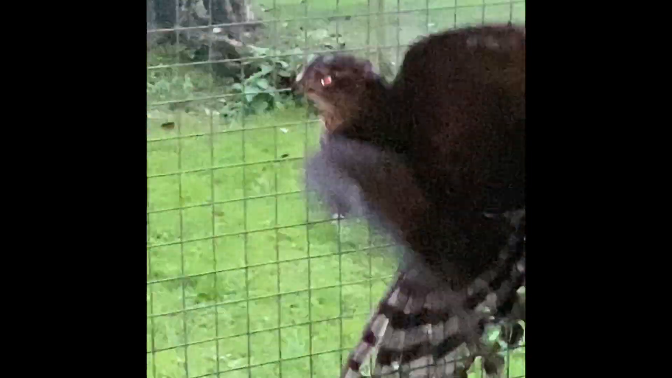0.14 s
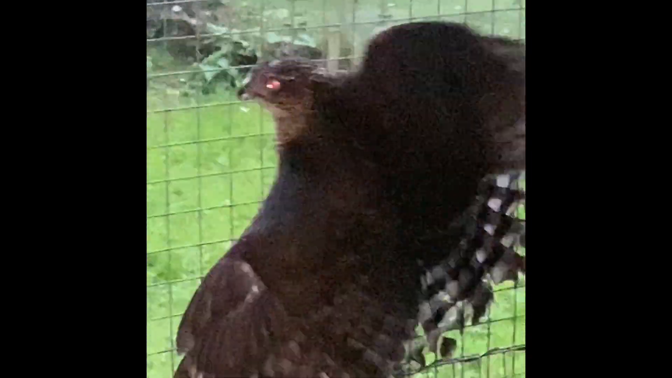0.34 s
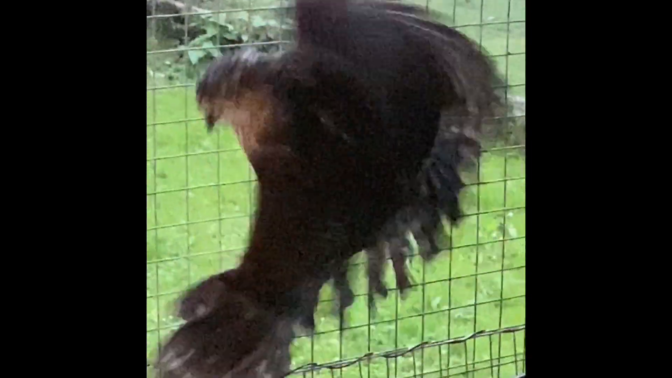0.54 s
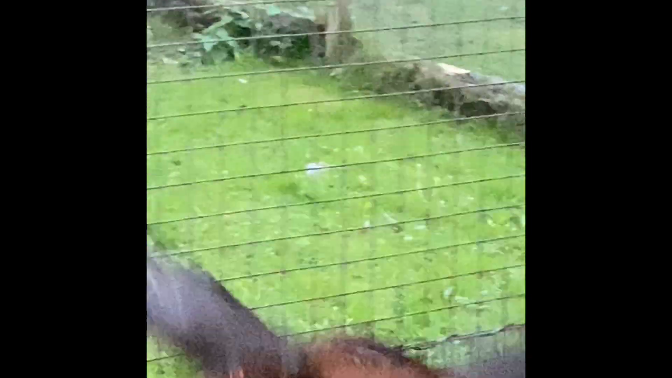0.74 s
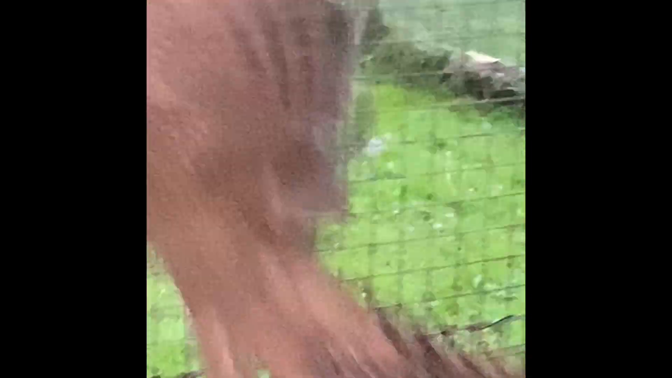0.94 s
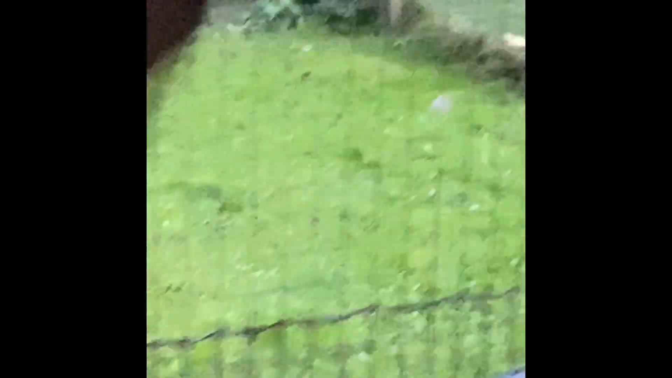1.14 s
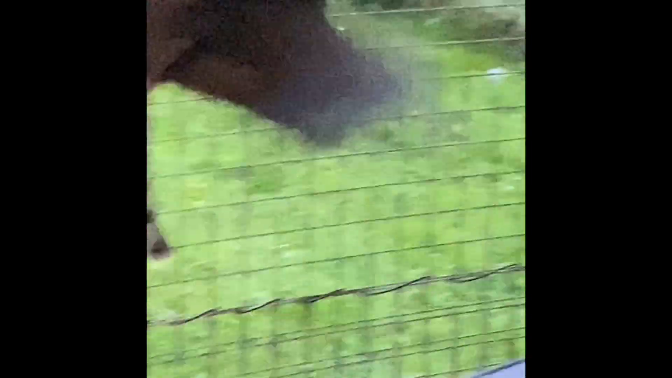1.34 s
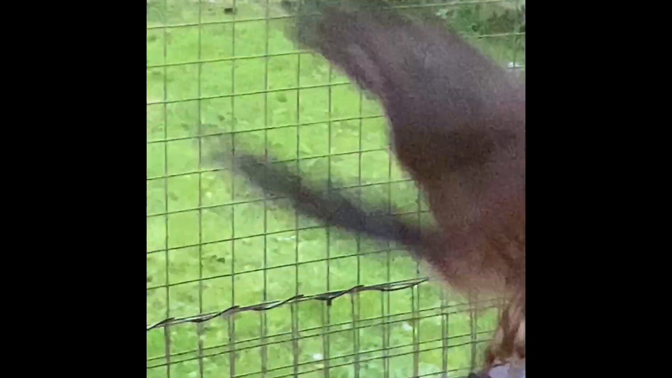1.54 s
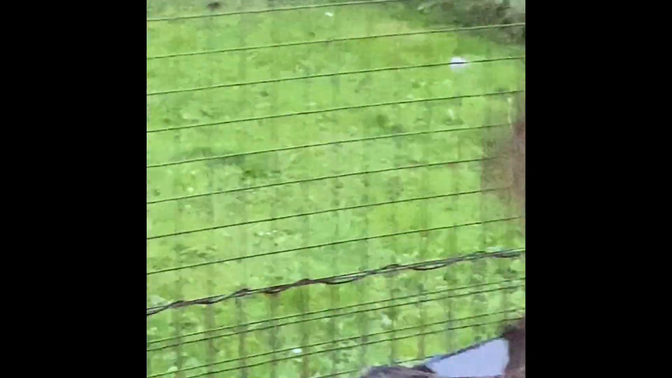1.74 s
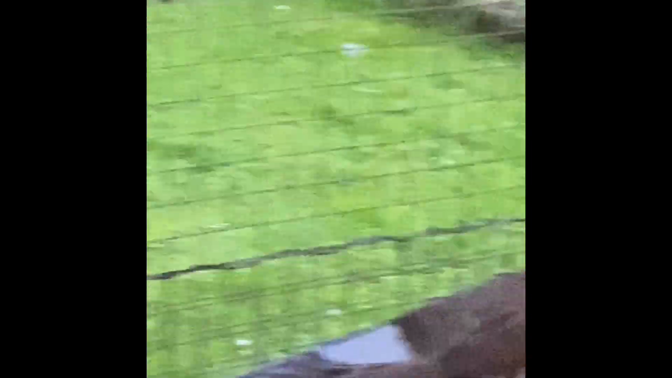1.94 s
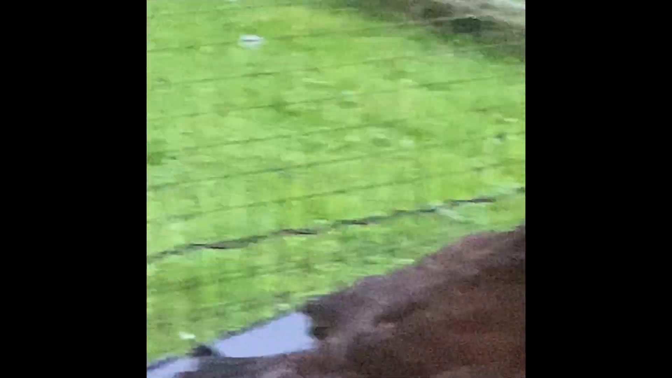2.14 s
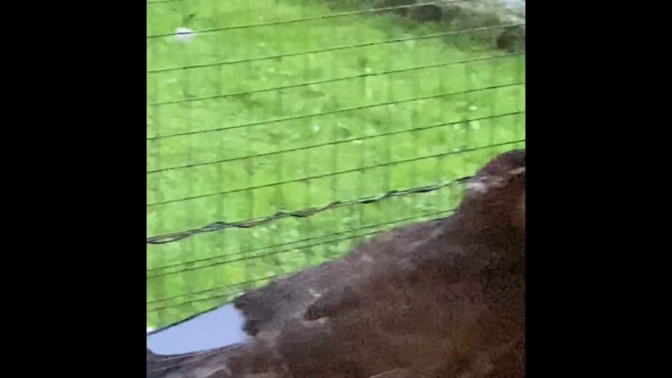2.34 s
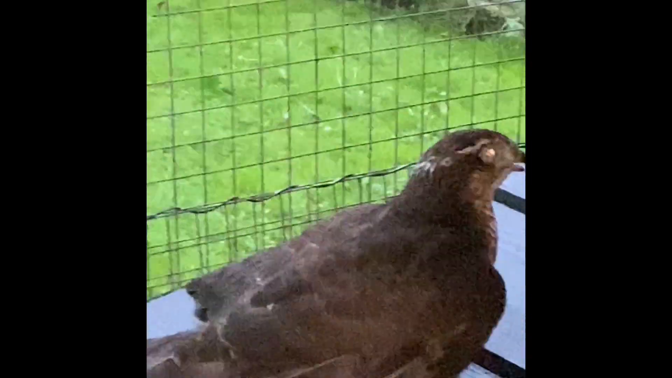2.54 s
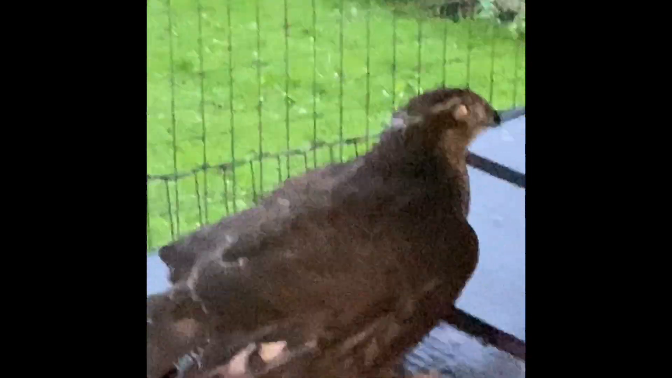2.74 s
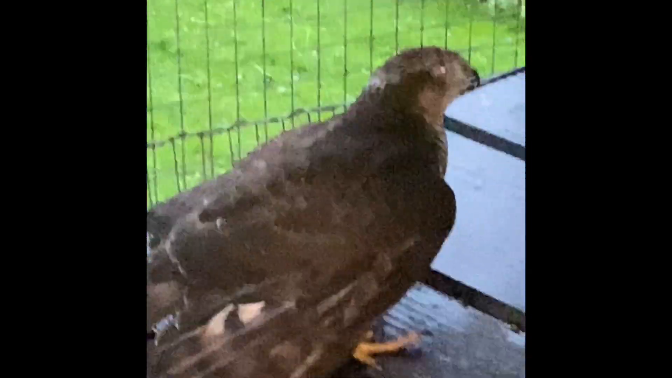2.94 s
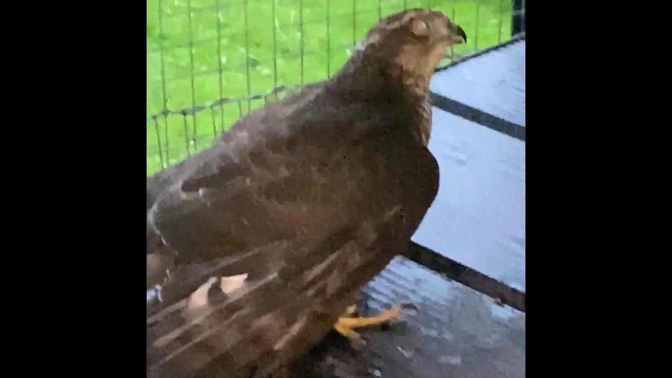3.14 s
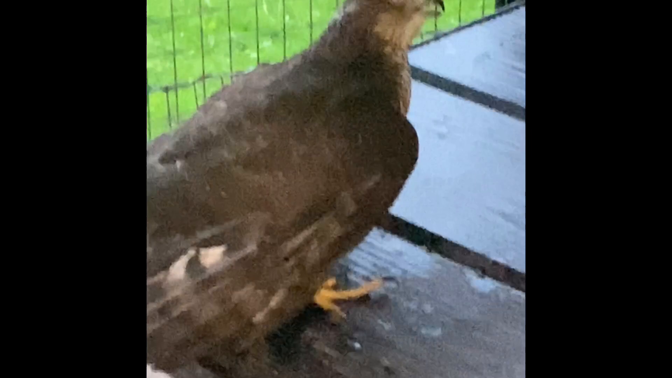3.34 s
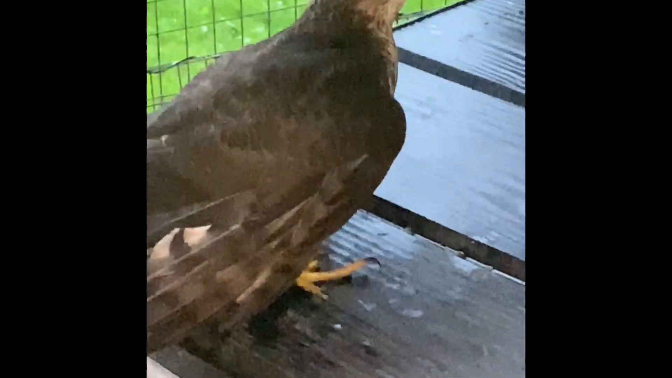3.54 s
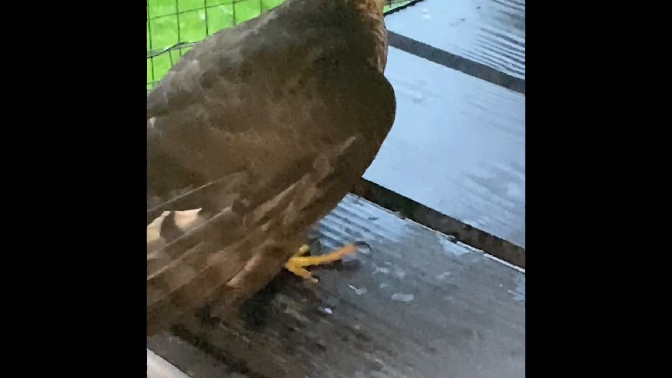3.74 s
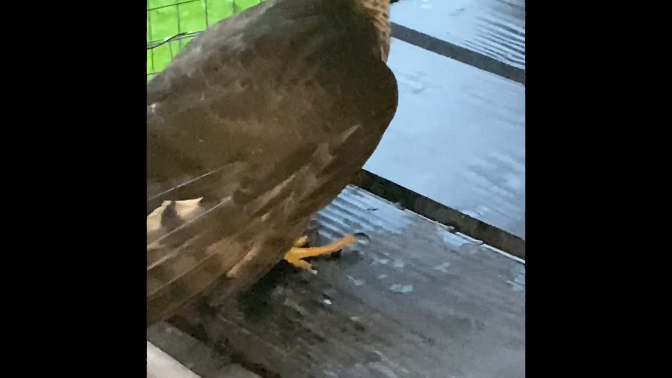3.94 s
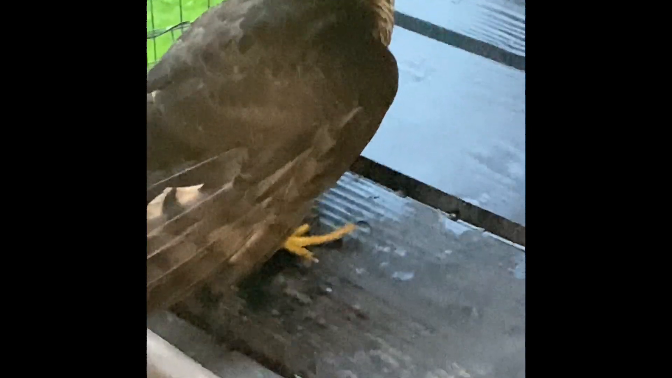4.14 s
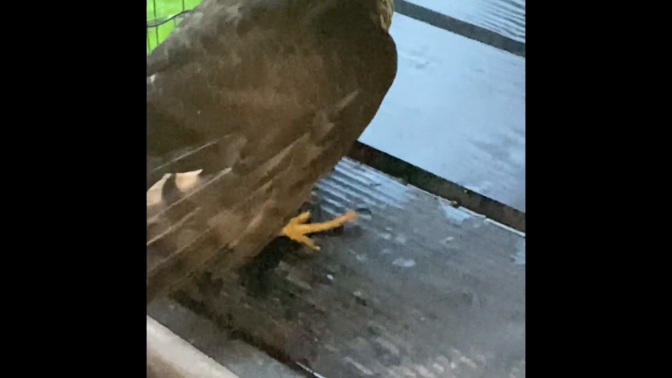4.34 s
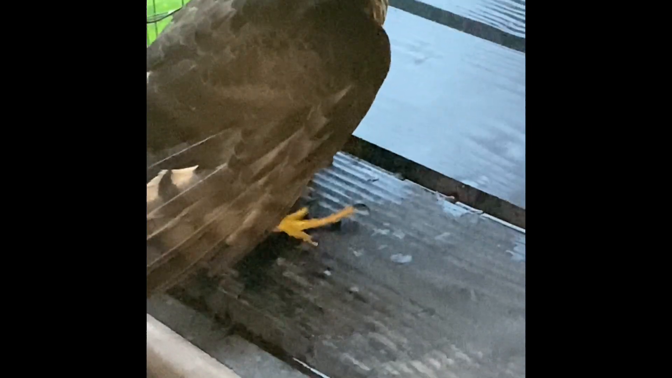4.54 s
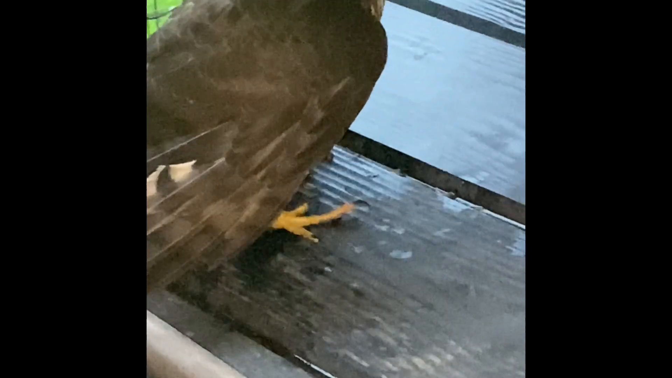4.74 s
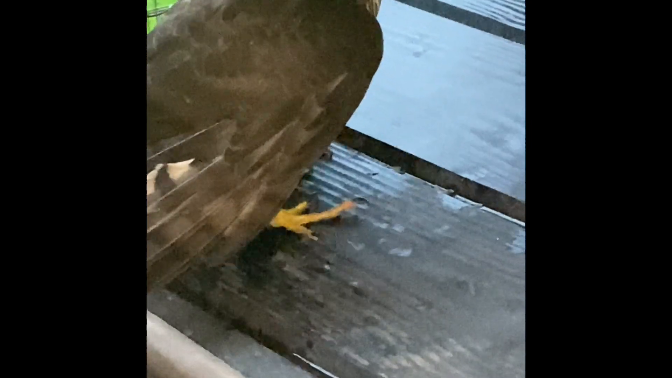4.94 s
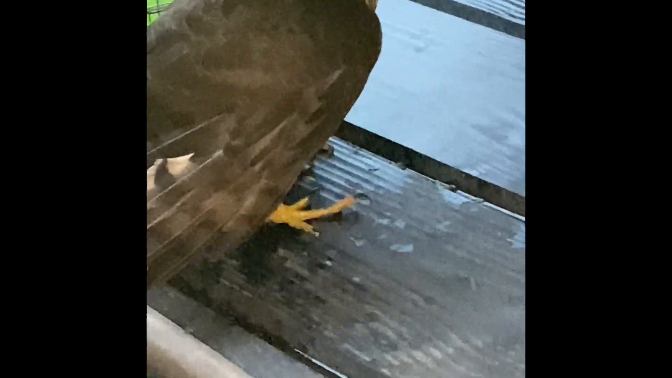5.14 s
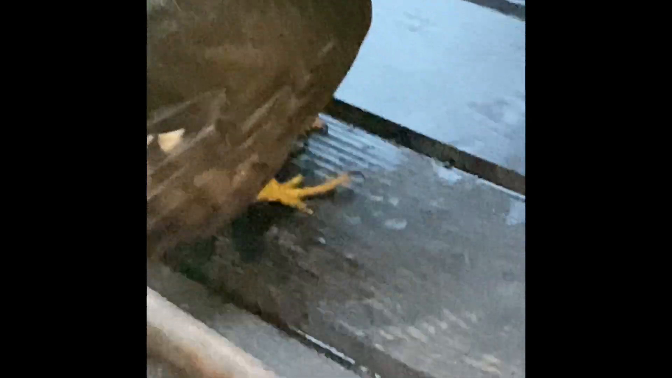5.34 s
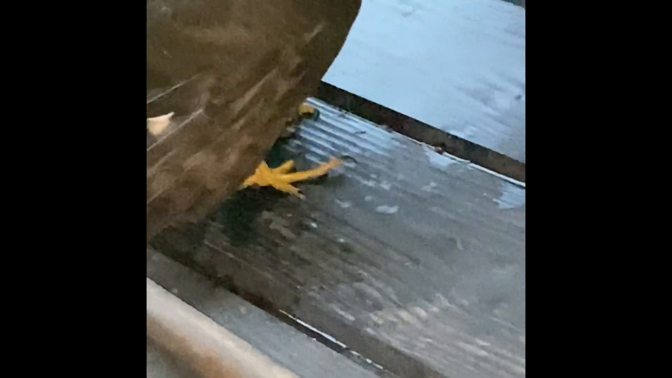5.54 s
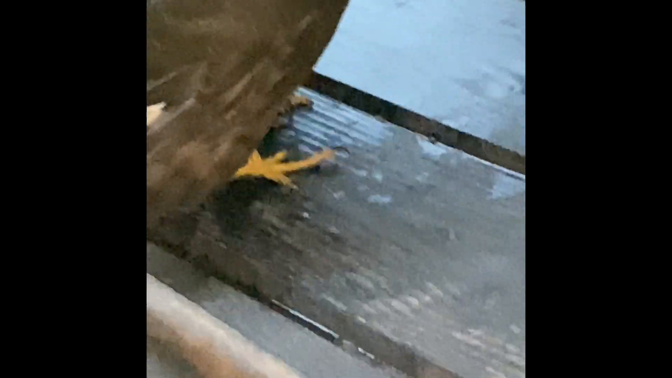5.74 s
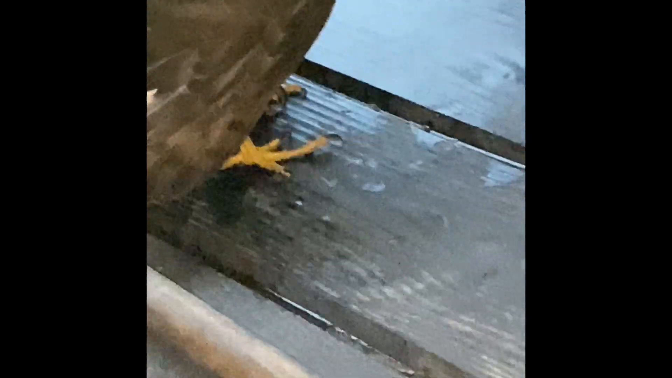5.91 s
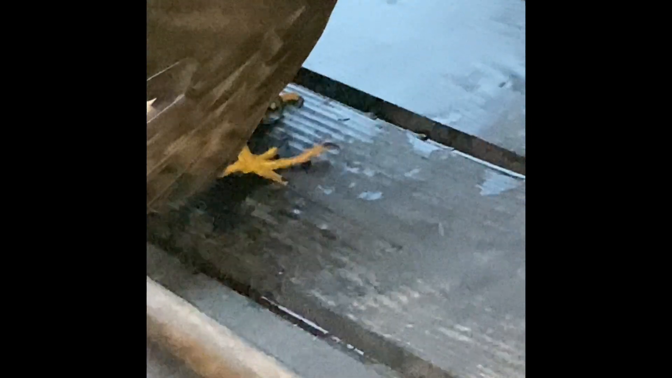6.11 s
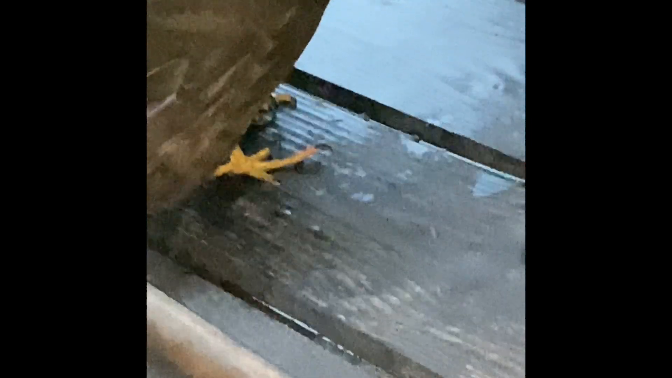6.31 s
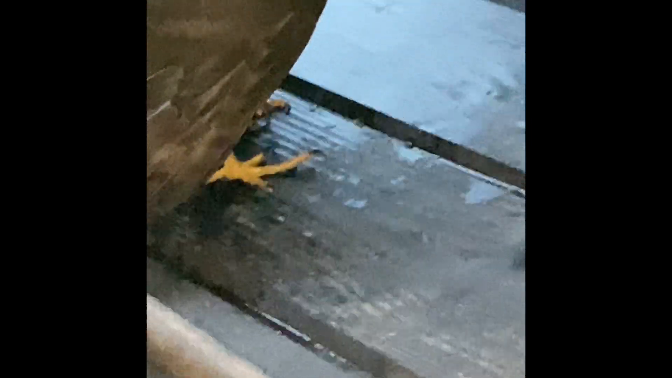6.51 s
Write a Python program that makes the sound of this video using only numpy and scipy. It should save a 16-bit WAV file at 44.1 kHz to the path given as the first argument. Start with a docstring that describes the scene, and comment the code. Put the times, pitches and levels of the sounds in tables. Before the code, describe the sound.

A quiet garden, heard by a stereo microphone close to a wire pen. At 0 s air and feathers stir, with a soft thump and dull cluck at 0.08, then hollow knock-like clucks at 0.34, 0.58 (strongest) and 0.92. Around 0.5-0.75 wings swish and zip over the mesh, with wire snaps, a twang and thuds. From 0.94 to 1.8 the thrashing is loudest: grainy hissing sweeps, flapping slaps, hard ticks, low air puffs, then heavy thumps at 1.4 and 1.55-1.65 with bright twangs. It fades to small rustles by 2.2. From 2.85 to 4.3 a distant small songbird sings thin high whistles, then quick gliding and buzzing notes, echoing in trees; one cluck falls at 3.17. Rougher, more open clucks follow at 4.42, 4.91, 5.11, faintly 5.67, and 6.35, with low hoarse murmurs between 4.5 and 5.6. Faint crisp plumage rustles and soft hush last until about 6.7.

```python
"""A hawk thrashes against the wire mesh of a garden pen, then settles on the wet boards.
Its feathers hiss and zip as noise, wires tick, snap and twang, the frame rings in decaying tones, and air puffs.
Short knock-like clucks and hoarse murmurs, probably a hen's, are uneven pulses sent through resonances.
A small songbird in the trees sings one phrase of gliding and buzzing tones; the garden is a faint hush of noise."""
import sys
import numpy as np
from scipy import signal
from scipy.fft import rfft, irfft, next_fast_len
from scipy.io import wavfile
from scipy.ndimage import uniform_filter1d

SR = 44100
rng = np.random.default_rng(int(sys.argv[2]) if len(sys.argv) > 2 else 0)


def digitize_waveform(pressure):
    """Quantize a signal to 16-bit integers and store it at the path in sys.argv[1].

    Rows of a 2-D input are taken as channels; values are limited to [-1, 1].
    """
    field = np.atleast_2d(pressure).T
    bounded = np.clip(field, -1, 1)
    quanta = np.round(bounded * 32767).astype(np.int16)
    wavfile.write(sys.argv[1], SR, quanta)


N = 294132
TIME = np.arange(N) / SR


def from_db(db):
    """Turn decibels into a gain."""
    return 10 ** (np.asarray(db) / 20)


def rms_one(x):
    """Scale a sound to an rms of 1."""
    return x / np.sqrt(np.mean(x ** 2) + 1e-20)


def level(rows):
    """Gain at every sample from rows (time [s], level [dB])."""
    return from_db(np.interp(TIME, *np.transpose(rows)))


def at_hz(points, hz):
    """Read a table of rows (frequency, value) on a log-frequency axis."""
    table_hz, values = np.array(points)[:, 0], np.array(points)[:, 1]
    return np.interp(np.log(hz), np.log(table_hz), values)


def add(track, s, sound):
    """Mix a short sound into the track at time s."""
    start = max(round(s * SR), 0)
    track[start:start + len(sound)] += sound[:max(N - start, 0)]


def drift(rate):
    """Random wander around 0: a new random value `rate` times a second, joined by straight lines."""
    knots = rng.standard_normal(8192)
    return np.interp(TIME * rate, np.arange(len(knots)), knots)


def lowpass(x, order, cutoff_hz):
    """Dull a sound above the cutoff."""
    return signal.sosfilt(signal.butter(order, cutoff_hz, fs=SR, output="sos"), x)


def resonate(x, hz, width):
    """Two-pole resonance with gain 1 on top."""
    r = np.exp(-np.pi * width / SR)
    top = np.array([1, 0, -1]) * (1 - r * r) / 2
    return signal.lfilter(top, [1, -2 * r * np.cos(2 * np.pi * hz / SR), r * r], x)


def ring(clicks, hz, t60):
    """A unit click sets a sine of height 1 ringing; it falls by 60 dB in t60 seconds."""
    r, w = np.exp(-np.log(1000) / (t60 * SR)), 2 * np.pi * hz / SR
    return signal.lfilter([0, np.sin(w)], [1, -2 * r * np.cos(w), r * r], clicks + 1e-18)


def coloured(spectrum, likeness, grain_db=0):
    """Stereo noise of rms 1 in half-octave bands; grain_db clumps it into tiny clicks."""
    edges = 22 * 2 ** np.arange(0, 10, .5)
    clumps = np.repeat(rng.standard_normal(N // 16 + 1).clip(-3, 3), 16)[:N]
    white = rng.standard_normal((2, 2, N)) * from_db(grain_db * clumps)
    out = 0
    for k, (low, high) in enumerate(zip(edges, edges[1:])):
        band = signal.butter(2, [low, high], "band", fs=SR, output="sos")
        mid, side = signal.sosfilt(band, white[k % 2])   # neighbouring bands use separate noise
        hz = np.sqrt(low * high)
        alike = np.clip(at_hz(likeness, hz), -1, 1)
        stereo = np.sqrt(1 + alike) * mid + np.sqrt(1 - alike) * side * [[1], [-1]]
        out = out + from_db(at_hz(spectrum, hz)) * stereo
    return rms_one(out)


def scatter(x, t60, wet_db, apart):
    """Add dense fading echoes as noise tails, partly different at each port."""
    t = TIME[:SR]
    shared, own = rng.standard_normal((2, SR))
    fade = np.exp(-np.log(1000) * t / t60) * (t > .005)
    tail = (shared + apart * own * [[1], [-1]]) * fade
    tail = tail / np.sqrt(np.sum(tail ** 2) / 2)
    return x + from_db(wet_db) * signal.fftconvolve(np.atleast_2d(x), tail, axes=1)[:, :N]


# tone colour of the distant hush: (frequency [Hz], relative level per Hz [dB])
GARDEN_COLOUR = [(24, -1), (45, -5), (90, -4.5), (200, -6.5), (560, -7), (900, -10), (1400, -9),
                 (2800, -15), (5500, -24), (8000, -32.5), (12000, -33), (16000, -41)]
# how alike left and right are in the hush: (frequency [Hz], likeness [-1 to 1])
GARDEN_LIKENESS = [(60, 0.94), (130, 0.96), (290, 0.73), (640, 0.022), (1400, 0.26), (3100, 1), (7000, 1),
                   (15000, 1)]
# loudness of the hush: (time [s], level [dB])
HUSH_LEVEL = [(0, -62.5), (2.6, -60.5), (3.6, -62.5), (3.9, -59), (4.5, -60), (5.25, -62), (5.38, -61),
              (6.2, -64.5), (6.67, -62)]


def garden():
    """The distant garden is a steady, slightly grainy noise whose level wanders."""
    hush = coloured(GARDEN_COLOUR, GARDEN_LIKENESS, grain_db=3.0)
    return level(HUSH_LEVEL) * from_db(drift(12)) * hush


TRILL_HZ = 123.3   # how often the pitch swings up and down each second


def song_note(length, start_hz, end_hz, db, trill_hz, waver_hz, arch_hz=0):
    """One note: a sine on an arched glide, with a trill and a random waver on its pitch."""
    u = np.linspace(0, 1, int(length * SR))
    glide = start_hz + (end_hz - start_hz) * u + arch_hz * np.sin(np.pi * u)
    trill = trill_hz * np.sin(2 * np.pi * TRILL_HZ * length * u)
    hz = glide + trill + waver_hz * drift(396.0)[:len(u)]
    swelling = np.sqrt(2) * np.sin(np.pi * u)
    return from_db(db) * swelling * np.sin(2 * np.pi * np.cumsum(hz) / SR)


# whistled glides: (time [s], length [s], start pitch [Hz], end pitch [Hz], level [dB],
# arch of the glide [Hz], trill depth [Hz])
SONG_WHISTLES = [(2.848, 0.11, 9150, 8400, -63, 10, 97), (2.949, 0.069, 8940, 8800, -63.5, 11, 108),
                 (3.188, 0.043, 4640, 4660, -62, 1, -4), (3.211, 0.073, 4130, 3780, -50, -95.5, -4),
                 (3.215, 0.083, 2680, 3080, -60, -70, 4), (3.29, 0.049, 3200, 3540, -52, 63, 0),
                 (3.336, 0.045, 3560, 3510, -53, 0, 0), (3.558, 0.022, 2620, 4500, -57, -150, 0),
                 (3.575, 0.029, 3950, 5300, -49.5, -2, 100), (3.629, 0.025, 5170, 5230, -48, 65, 3),
                 (3.634, 0.034, 4100, 2950, -64, -480, -2), (3.687, .028, 4800, 5300, -51, 3, 198),
                 (3.707, 0.024, 4600, 3520, -52, -280, 2), (3.824, 0.064, 5400, 5850, -68.5, 122, 150),
                 (3.909, 0.077, 3760, 3780, -51, 45, 33), (3.989, 0.04, 3480, 3950, -49.5, 4, 177),
                 (4.031, 0.041, 5250, 5080, -57.5, -3, 60), (4.05, 0.068, 3900, 4520, -47.5, 118, 203),
                 (4.221, 0.045, 3250, 3680, -54.5, -100, 0), (4.25, 0.02, 3330, 3290, -71, -6, 0),
                 (4.282, 0.063, 3400, 3750, -66, 0, 150), (4.347, 0.064, 4270, 4050, -65.5, 0, 0)]
# buzzy notes: (time [s], length [s], centre pitch [Hz], level [dB], rise in pitch [Hz], trill depth [Hz])
SONG_BUZZES = [(3.113, 0.15, 3316, -58.5, -300, 450), (3.118, 0.15, 4930, -57.5, -500, 402),
               (3.459, 0.092, 4680, -52.5, 1303, 590), (3.57, 0.046, 4550, -51.5, 899, 400),
               (3.653, 0.05, 4580, -47.5, 202, 200), (3.697, 0.037, 4560, -49.5, -900, 454),
               (3.811, 0.025, 3050, -60, 300, 403), (3.815, 0.074, 4270, -57, 296, 450),
               (3.899, 0.034, 4800, -57, 498, 200), (4.146, 0.043, 5010, -47.5, 606, 250)]
WHISTLE_WAVER_HZ, BUZZ_WAVER_HZ = 42, 180   # random waver of the pitch
TREES_T60_S, TREES_DB = 0.51, 1   # echoes of the song


def songbird():
    """Whistles and buzzes, both gliding sines, waver in loudness and are blurred by echoes in the trees."""
    out = np.zeros(N)
    for s, length, start_hz, end_hz, db, arch_hz, trill_hz in SONG_WHISTLES:
        add(out, s, song_note(length, start_hz, end_hz, db, trill_hz, WHISTLE_WAVER_HZ, arch_hz))
    for s, length, hz, db, rise_hz, depth_hz in SONG_BUZZES:
        add(out, s, song_note(length, hz - rise_hz / 2, hz + rise_hz / 2, db, depth_hz, BUZZ_WAVER_HZ))
    return scatter(out * from_db(2.5 * drift(220)), TREES_T60_S, TREES_DB, apart=0.25)


def formants(x, modes):
    """Parallel steep resonances from rows (frequency [Hz], width [Hz], level [dB]); rms 1."""
    out = 0
    for hz, width, db in modes:
        band = signal.butter(2, [max(hz - width / 2, 30), hz + width / 2], "band", fs=SR, output="sos")
        out = out + from_db(db) * resonate(signal.sosfilt(band, x), hz, 2 * width)
    return rms_one(out)


# resonances of the mouth: (frequency [Hz], width [Hz], relative level [dB])
MOUTH_RESONANCES = [(347, 192, 6.5), (549, 153, 12.5), (720.4, 160, 8)]
# upper resonances: (multiple of the beak resonance [ratio], width [Hz], relative level [dB])
BEAK_RESONANCES = [(.44, 300, -9.5), (.65, 200, -3.5), (1, 242, 2.5), (1.17, 130, -3)]
# upper resonances grow with opening and with loudness: base, dB per dB of loudness, reference loudness
BEAK_DB, BEAK_PER_LOUD_DB, LOUD_DB = 6.5, 4.5, -28
THROAT_TOP_HZ = 1060   # with the beak shut little gets out above this
CLUCK_CREST_SHARE = 0.32   # a cluck is loudest this far into its length


def hen_note(length, pitch_hz, rough, throat_hz, db, open_db, beak_hz, crest=CLUCK_CREST_SHARE):
    """A few uneven pulses through the throat; an open beak adds further resonances."""
    t = TIME[:SR // 4]
    rough, progress = np.clip(rough, 0, 1), np.clip(t / length, 0, 1)
    jitter = rms_one(uniform_filter1d(rng.standard_normal(len(t)), size=120))
    falling = 0.056 * (1 - 2 * progress)   # the pitch slides down through the note
    cycles = np.cumsum(pitch_hz * (1 + falling + 0.04 * rough * jitter)) / SR
    pulses = rms_one(np.diff(np.floor(cycles + .5), prepend=0))
    effort = np.interp(progress, [0, np.clip(crest, .1, .9), 1], [0, 1, 0]) ** 0.66
    source = effort * ((1 - rough) * pulses + rough * rng.standard_normal(len(t)))
    throat = formants(source, [(throat_hz, 230, 0)])
    throat = throat + from_db(open_db) * formants(source, MOUTH_RESONANCES)
    beak = [(multiple * beak_hz, width, mode_db) for multiple, width, mode_db in BEAK_RESONANCES]
    beak_db = BEAK_DB + open_db + BEAK_PER_LOUD_DB * (db - LOUD_DB)
    voice = lowpass(throat, 4, THROAT_TOP_HZ) + from_db(beak_db) * formants(source, beak)
    return from_db(db) * rms_one(voice) * np.sqrt(length / t[-1])


LINGER_T60_S = 0.29   # a cluck's strongest partial rings on


def lingering(length, hz, db):
    """One partial builds up while the cluck lasts, then dies away."""
    t = TIME[:SR // 2]
    fade = from_db(db - 60 * np.maximum(t - length, 0) / LINGER_T60_S)
    build_up = np.minimum(t / length, 1) ** 2
    return fade * build_up * np.sqrt(2) * np.sin(2 * np.pi * hz * t)


# clucks: (time [s], length [s], pitch [Hz], roughness [0-1], throat resonance [Hz], level [dB],
# opening of the beak [dB], beak resonance [Hz], lingering note [Hz], level of the lingering note [dB])
HEN_CLUCKS = [(0.075, 0.0094, 262, 0.24, 520, -39.5, -26, 2200, 498, -56),
              (0.337, 0.013, 234, 0.08, 413, -36.5, -41, 2200, 459, -52),
              (0.581, 0.025, 258, 0.17, 459, -29, -26.5, 2190, 520, -46),
              (0.921, 0.024, 295, 0.55, 490, -35.5, -30, 2200, 502, -48),
              (3.171, 0.014, 244, 0.25, 463, -32, -9.5, 2160, 482, -47),
              (4.418, 0.015, 333, 0.47, 865, -43, 1.5, 2200, 724, -56.5),
              (4.91, 0.041, 375.5, 0.55, 737, -32, 3, 2200, 769, -48),
              (5.108, 0.038, 352.7, 0.71, 630, -33, -1.5, 2280, 577.5, -49),
              (5.674, 0.016, 320, 0.56, 545, -57.5, 9, 2200, 520, -68),
              (6.354, 0.028, 358, 0.45, 670, -41.5, 12.5, 2120, 718, -51)]
# low hoarse murmurs between clucks: (time [s], length [s], level [dB])
HEN_MURMURS = [(4.528, 0.12, -52), (4.691, 0.048, -55), (4.734, 0.155, -54.5), (4.885, 0.028, -55),
               (5.343, .12, -67), (5.497, 0.136, -68.5)]
MURMUR_HZ, MURMUR_THROAT_HZ, MURMUR_BEAK_HZ = 318, 610, 2300
MURMUR_OPEN_DB, MURMUR_ROUGH = 12.5, 0.8
MURMUR_CREST_SHARE = 0.47   # a murmur swells nearly to its middle
WALL_ECHO_S, WALL_ECHO_DB = 0.04, -17.5   # a nearby wall throws the clucks back
YARD_T60_S, YARD_DB = .36, -11   # echoes of the yard
BOOM_HZ, BOOM_WIDTH_HZ, BOOM_T60_S, BOOM_DB = 263, 233, 0.38, -0.5   # the yard's low notes linger longest


def hen():
    """Short clucks and hoarse murmurs, echoing in the yard."""
    out, rings = np.zeros((2, N))
    for s, length, pitch_hz, rough, throat_hz, db, open_db, beak_hz, linger_hz, linger_db in HEN_CLUCKS:
        note = hen_note(length, pitch_hz, rough, throat_hz, db, open_db, beak_hz)
        add(rings, s, lingering(length, linger_hz, linger_db))
        add(out, s, note)
        add(out, s + WALL_ECHO_S, from_db(WALL_ECHO_DB) * note)
    for s, length, db in HEN_MURMURS:
        murmur = hen_note(length, MURMUR_HZ, MURMUR_ROUGH, MURMUR_THROAT_HZ, db,
                          MURMUR_OPEN_DB, MURMUR_BEAK_HZ, MURMUR_CREST_SHARE)
        add(out, s, murmur)
    near = scatter(out, t60=.11, wet_db=-8, apart=.7)
    low = resonate(resonate(out, BOOM_HZ, BOOM_WIDTH_HZ), BOOM_HZ, BOOM_WIDTH_HZ)
    boom = scatter(low, BOOM_T60_S, BOOM_DB, apart=0.16) - low   # keep only the echoes
    yard = scatter(near, YARD_T60_S, YARD_DB, apart=.6)
    return (yard + boom + rings) * from_db([[-.8], [.8]])   # a little louder on the right


def swell(s, db, rise, fade):
    """Power of a stroke that grows to a crest at time s and dies away."""
    distance = np.maximum((s - TIME) / rise, (TIME - s) / fade)
    return from_db(db) ** 2 * np.exp(-2 * np.minimum(distance, 20))


# faint crisp rustles once the bird has settled: (time [s], level [dB])
PLUMAGE_STIRS = [(2.12, -66), (2.44, -66.5), (3.38, -67), (3.76, -64.5), (4.35, -66.5), (5.83, -65),
                 (6.06, -65), (6.185, -63), (6.415, -63), (6.57, -65.5)]
# tone colour of these rustles: (frequency [Hz], relative level per Hz [dB])
CRISP_COLOUR = [(500, -41), (1500, 10), (4000, 10), (7000, 12.5), (11000, -7), (15500, -3)]
# how alike left and right are, here and in the wings: (frequency [Hz], likeness [-1 to 1])
HAWK_LIKENESS = [(60, .999), (170, .99), (400, 0.88), (800, 0.37), (1300, 0.4), (2000, 0.98), (5000, 1),
                 (14000, 1)]
STIR_RISE_S, STIR_FADE_S, STIR_GRAIN_DB = 0.033, 0.071, 4.5


def stirs():
    """Brief, crackly shifts of the plumage, made of clumped noise."""
    power = sum(swell(s, db, STIR_RISE_S, STIR_FADE_S) for s, db in PLUMAGE_STIRS)
    return np.sqrt(power) * coloured(CRISP_COLOUR, HAWK_LIKENESS, STIR_GRAIN_DB)


# the bird's weight landing on the pen: (time [s], strength of the blow [dB], contact time [s])
WEIGHT_THUMPS = [(0.077, -30, 0.012), (0.718, -17.5, 0.00065), (0.741, -18, 0.018), (1.391, -10, 0.038),
                 (1.549, -19, 0.0014), (1.56, -21, 0.00068), (1.582, -17, 0.00036), (1.6, -19, 0.00063),
                 (1.622, -27, 0.0018), (1.643, -9.5, 0.027)]
# the notes the frame rings at: (frequency [Hz], relative level [dB], time to fall by 60 dB [s])
FRAME_MODES = [(78.2, -10, 0.21), (109, -9.5, 0.067), (184.7, -20, 0.163), (256.5, -8.5, 0.09),
               (312.2, -8, 0.18), (366, -1, 0.034), (520, -9, 0.063), (635, -17, 0.086)]


def frame():
    """Soft blows shake the pen; the longer the contact, the more weakly high modes answer."""
    out = np.zeros(N)
    for k, (hz, mode_db, t60) in enumerate(FRAME_MODES):
        clicks = np.zeros(N)
        for s, db, contact in WEIGHT_THUMPS:
            strength = from_db(db + mode_db + rng.normal(0, 2.5, 1))   # each mode is struck a bit unevenly
            add(clicks, s, strength / np.hypot(1, hz * contact))
        out += (-1) ** k * ring(clicks, hz, t60)   # neighbouring modes swing in opposite directions
    return scatter(out, t60=0.62, wet_db=-9.5, apart=0.089) * from_db([[-.5], [.5]])


# a stretched wire let go by a talon: (time [s], level [dB], brightness [Hz])
WIRE_TWANGS = [(0.6966, -29.5, 3270), (0.7004, -33, 1900), (1.542, -25, 4500), (1.621, -22.5, 4530)]
TWANG_LAG_S = 0.0035   # bending waves: 1 kHz arrives this late, higher notes sooner


def twangs():
    """The wire spreads a flick into a short falling chirp that runs on round the mesh."""
    out, hz = np.zeros(N), np.arange(1, 2050) * SR / 4096
    travel = np.exp(-4j * np.pi * TWANG_LAG_S * np.sqrt(1000 * hz))
    for s, db, bright_hz in WIRE_TWANGS:
        loudness = hz / np.hypot(hz, 600) / (1 + (hz / bright_hz) ** 2) / hz ** .5
        chirp = irfft(travel * loudness)[:SR // 40]
        add(out, s, from_db(db) * chirp / np.abs(chirp).max())
    return scatter(out, t60=0.041, wet_db=-2.0, apart=0.33)


# quills and talons snapping over a wire: (time [s], level [dB], centre of the tick [Hz],
# share of broad crack [0-1])
WIRE_SNAPS = [(0.078, -36.5, 1470, 0.4), (.468, -47, 1560, 0.5), (0.518, -51, 2530, .3),
              (0.526, -40, 1740, 0.4), (0.7143, -25.5, 3800, 0), (.717, -24.5, 2300, 0.05),
              (.761, -31, 3020, 0.84), (.834, -41, 2640, 0.1), (0.863, -38, 2100, 0),
              (.907, -36, 4800, 0.3), (.9436, -19, 1280, 0.25), (0.954, -18.5, 2580, 0.04),
              (1.0174, -19, 1900, 0.2), (1.1387, -36, 2250, 0.1), (1.159, -25.5, 1190, .3),
              (1.253, -29, 5800, 0.95), (1.392, -27, 1500, 0.2), (1.546, -22, 3020, 0),
              (1.59, -23, 7000, 0.8), (1.593, -31, 6000, 0.8), (1.598, -34, 5000, 0.9),
              (1.6055, -37, 2900, 0.1), (1.621, -23, 2420, 0.1), (1.625, -27.5, 4450, 0),
              (1.642, -42, 3200, 0.5), (1.728, -27.5, 3520, 0), (1.782, -27.5, 1850, 0),
              (1.955, -40, 1800, 0.7), (2.161, -49, 2750, 0), (2.736, -47, 1680, 0)]
SNAP_FADE_S = 0.002


def mesh():
    """A plucked wire cracks and ticks at a pitch of its own, damped at once by its neighbours."""
    out, t = np.zeros(N), TIME[:SR // 50]
    for s, db, hz, share in WIRE_SNAPS:
        crack = rng.standard_normal(len(t)) * np.exp(-t / SNAP_FADE_S)
        share = np.clip(share, 0, 1)
        broad = lowpass(crack, 1, 7000)
        tick = 2.0 * resonate(crack, hz, hz / 2)
        add(out, s, from_db(db) * (share * broad + (1 - share) * tick))
    return scatter(out, t60=0.22, wet_db=-4.0, apart=0.081)


# stiff flight feathers zipping along a wire: (time of the crest [s], level [dB], rise [s], fade [s],
# pitch at the crest [Hz])
FEATHER_SWISHES = [(0.568, -42, 0.012, 0.013, 5350), (0.61, -52.5, .03, 0.033, 4870),
                   (0.675, -58, 0.0066, .01, 4320), (2.105, -59, 0.021, 0.028, 6400)]
SWISH_SAG_HZ_PER_S, SWISH_WIDTH_HZ = 6500, 1000   # the zip drops as the wing slows


def swishes():
    """Barbs passing a wire make a narrow hiss whose pitch follows the wing's speed."""
    out = 0
    for s, db, rise, fade, hz in FEATHER_SWISHES:
        pitch = hz - SWISH_SAG_HZ_PER_S * np.clip(TIME - s, -.1, .1)
        barbs = lowpass(rng.standard_normal((2, N)), 2, SWISH_WIDTH_HZ / 2)
        phase = 2 * np.pi * np.cumsum(pitch) / SR
        # slow noise on two carriers becomes a narrow band around the pitch
        hiss = rms_one(barbs[0] * np.cos(phase) + barbs[1] * np.sin(phase))
        out = out + np.sqrt(swell(s, db, rise, fade)) * hiss
    return out


# each wire ticks at a pitch of its own: frequency [Hz]
WIRE_TICK_HZ = [800, 1200, 1700, 2400, 3300, 4400, 5600, 10000]
TICKS_PER_S = 450   # quills flicking over the wires, on average


def ticks():
    """A coarse run of short ticks of uneven size, dealt at random to the wires; rms 1."""
    happens = rng.random(N) < TICKS_PER_S / SR
    sizes = happens * rng.uniform(.25, 1, N) ** 2 * rng.choice([-1, 1], N)
    wire = rng.integers(0, len(WIRE_TICK_HZ), N)
    out = 0
    for k, hz in enumerate(WIRE_TICK_HZ):
        out = out + rms_one(resonate(sizes * (wire == k) + 1e-18, hz, hz / 4))
    return rms_one(out)


# a wing dragged along the mesh: (time of the crest [s], level [dB], fade [s], body of the wing [dB])
WING_SWEEPS = [(0.234, -62, 0.066, -8), (0.562, -40.5, 0.033, -2.5), (0.678, -42, 0.011, -16),
               (0.731, -38, 0.01, 7), (0.873, -54, 0.029, 13), (1.032, -32, 0.026, 6.5),
               (1.071, -54, 0.057, 28), (1.164, -43, 0.036, 9), (1.574, -43.5, 0.016, 15)]
# a wing slapping the mesh: (time of the crest [s], level [dB], fade [s], body of the wing [dB])
WING_SLAPS = [(0.077, -49.5, 0.038, -12), (0.473, -57.5, 0.022, 11), (0.516, -51.5, 0.013, 11),
              (.944, -36.5, 0.022, 5), (0.96, -28, 0.012, 4.5), (1.258, -40.5, 0.005, 6),
              (1.387, -32.5, 0.03, 4.5), (1.548, -35.5, 0.005, 10.5), (1.624, -35, 0.004, 16),
              (1.726, -41.5, 0.0075, 4), (1.782, -48.5, 0.02, -12)]
# plumage stirring between the blows, before each layer's own gain: (time [s], level [dB])
RUSTLE_LEVEL = [(0, -42.5), (.2, -53), (.45, -58.5), (.55, -45.5), (.85, -54), (1.0, -38), (1.1, -44),
                (1.25, -40), (1.5, -38), (1.8, -46), (2.5, -60.5), (6.67, -74.5)]
# air stirring round the microphone, before the air gain: (time [s], level [dB])
DRAUGHT_LEVEL = [(0, -33), (.17, -38), (.35, -44), (.6, -46.5), (.98, -38.5), (1.1, -30), (1.75, -43),
                 (2.05, -44), (2.4, -47.5), (3.7, -57.5), (4.6, -58.5), (5.6, -60.5), (6.67, -104)]
# tone colour of the feather hiss: (frequency [Hz], relative level per Hz [dB])
BARB_COLOUR = [(300, -37.5), (900, -23), (2000, 11), (3500, 7.5), (5300, 11), (7000, 7.5), (8500, 11),
               (11000, -2), (13000, 9), (15500, -13)]
# tone colour of the whole wing: (frequency [Hz], relative level per Hz [dB])
WING_COLOUR = [(60, -6), (130, 3.5), (280, -10), (550, -4.5), (1100, -7.5), (2000, -16.5), (4000, -22.5),
               (9000, -39)]
# tone colour of the moving air: (frequency [Hz], relative level per Hz [dB])
AIR_COLOUR = [(25, -17), (45, -3.5), (80, 3), (110, -5), (160, -13.5), (260, -10.5), (450, -24.5),
              (900, -89)]
SWEEP_RISE_SHARE = 0.85   # a sweep's rise time over its fade time
SLAP_RISE_S = 0.0045
BARB_GRAIN_DB, TICKS_DB = 4.8, -6   # graininess of the hiss; ticks under the stroke
PUFF_DB, PUFF_LAG_S = -14, 0.063   # air that follows each stroke, relative to the wing's body


def wings():
    """Each stroke drags barbs over the wires: a grainy hiss on the duller flap of the wing, then a puff of air."""
    strokes = [(s, db, SWEEP_RISE_SHARE * fade, fade, body_db) for s, db, fade, body_db in WING_SWEEPS]
    strokes += [(s, db, SLAP_RISE_S, fade, body_db) for s, db, fade, body_db in WING_SLAPS]
    hiss, flap, rustle = 0, 0, level(RUSTLE_LEVEL) ** 2   # these three are powers
    for s, db, rise, fade, body_db in strokes:
        power = swell(s, db, rise, fade)
        hiss = hiss + power
        flap = flap + power * from_db(body_db) ** 2
    flutter = from_db(0.75 * drift(170))   # single feathers flick past
    barb_noise = coloured(BARB_COLOUR, HAWK_LIKENESS, BARB_GRAIN_DB)
    barbs = np.sqrt(hiss + rustle * from_db(-35.5)) * barb_noise
    wing = from_db(-5.0) * np.sqrt(flap + rustle) * coloured(WING_COLOUR, HAWK_LIKENESS, grain_db=0.0)
    linger = np.exp(-1 / (PUFF_LAG_S * SR))
    puffs = from_db(PUFF_DB) ** 2 * signal.lfilter([1 - linger], [1, -linger], flap)
    air_level = np.sqrt(puffs + level(DRAUGHT_LEVEL) ** 2)
    air = from_db(-4.5) * air_level * coloured(AIR_COLOUR, HAWK_LIKENESS)
    quills = from_db(TICKS_DB) * np.sqrt(np.minimum(hiss, flap)) * ticks()
    return flutter * (barbs + wing) + quills + air


def scene():
    """The hawk close by, hen and songbird farther off, the garden behind."""
    hawk = wings() + swishes() + mesh() + twangs() + frame() + stirs()
    return hawk + hen() + songbird() + garden()


# microphone pair: (frequency [Hz], phase by which the left port leads [radians])
PORT_LEAD = [(0, 0), (1000, .15), (2600, .55), (3400, .3), (5200, .55), (6300, 1.6), (7300, 3.14),
             (8300, 4.2), (10400, 6.28), (12000, 7.5), (13600, 9.42), (14800, 10.6), (16000, 11.8)]
RUMBLE_CUT_HZ, TOP_CUT_HZ = 48, 15900


def record(dry):
    """The two microphone ports drift out of phase in the treble; deep rumble and the top are cut off."""
    size = next_fast_len(N + SR // 10)
    lead = np.interp(np.arange(size // 2 + 1) * SR / size, *np.transpose(PORT_LEAD))
    turn = np.exp(.5j * lead * [[1], [-1]])   # half the lead to each side
    ports = irfft(rfft(dry, size) * turn, size)[:, :N]
    ports = signal.sosfilt(signal.butter(2, RUMBLE_CUT_HZ, "high", fs=SR, output="sos"), ports)
    return signal.sosfilt(signal.ellip(10, .1, 80, TOP_CUT_HZ, fs=SR, output="sos"), ports)


dry = scene()
out = record(dry)
digitize_waveform(out)
```